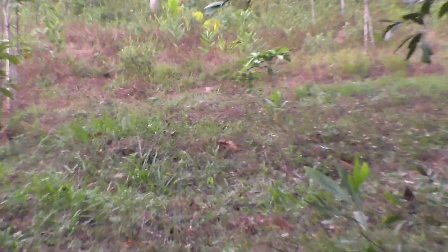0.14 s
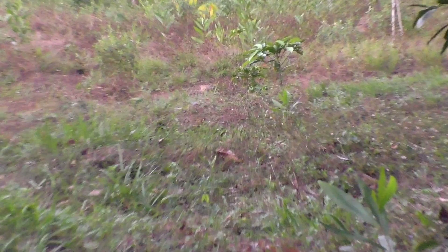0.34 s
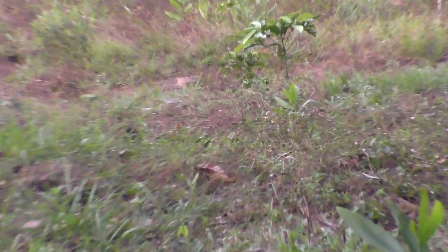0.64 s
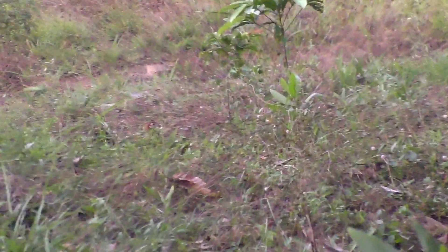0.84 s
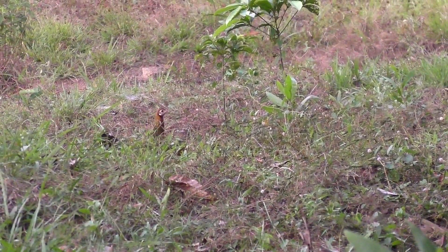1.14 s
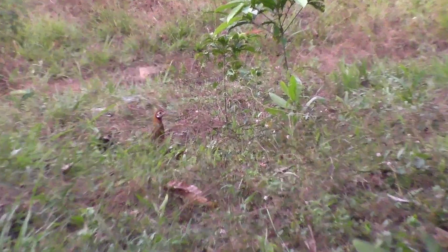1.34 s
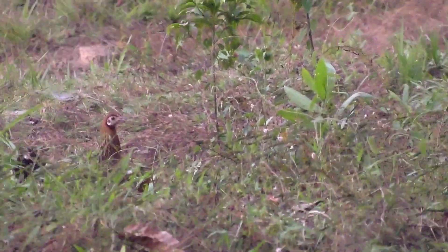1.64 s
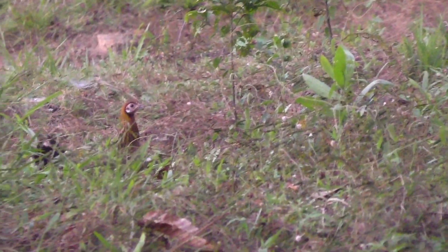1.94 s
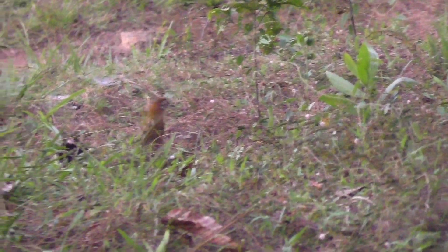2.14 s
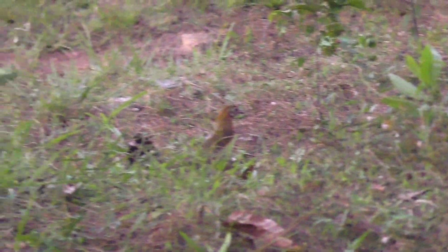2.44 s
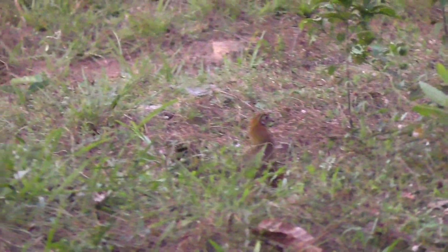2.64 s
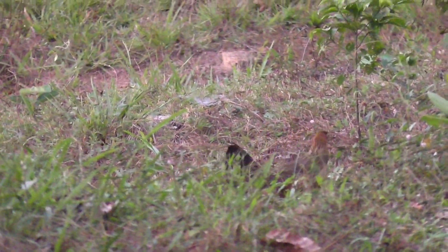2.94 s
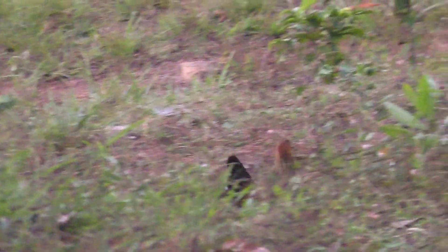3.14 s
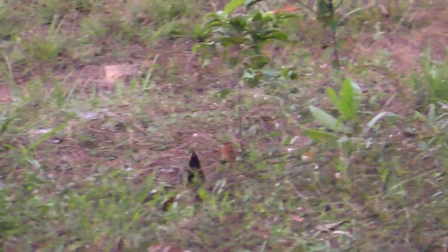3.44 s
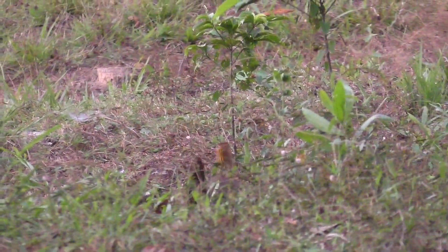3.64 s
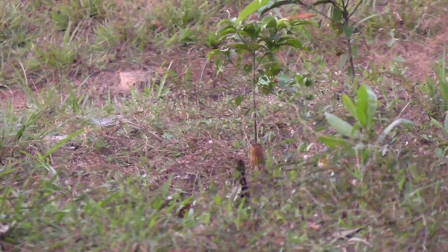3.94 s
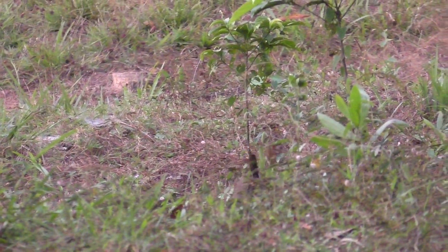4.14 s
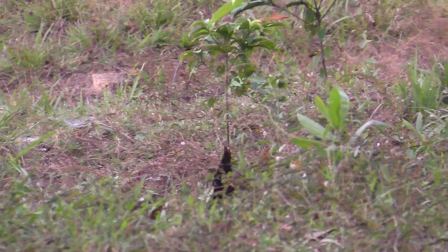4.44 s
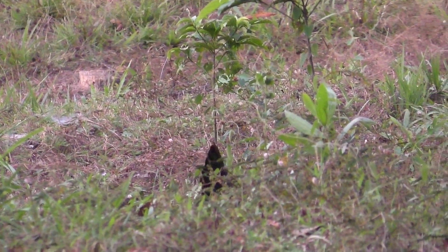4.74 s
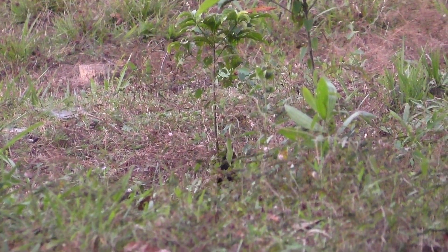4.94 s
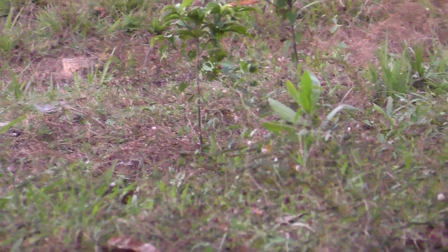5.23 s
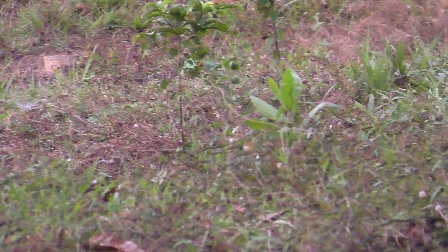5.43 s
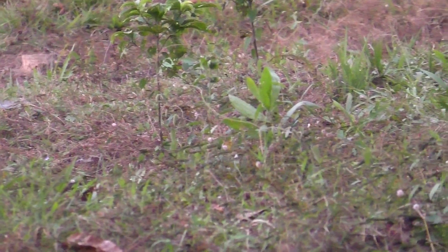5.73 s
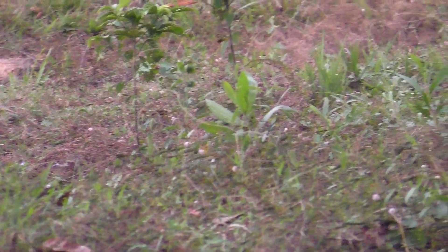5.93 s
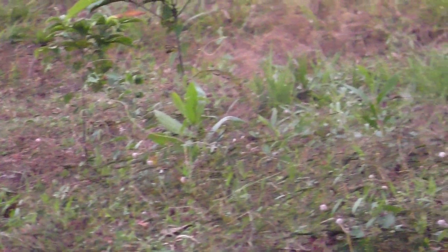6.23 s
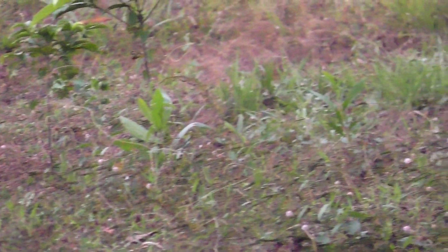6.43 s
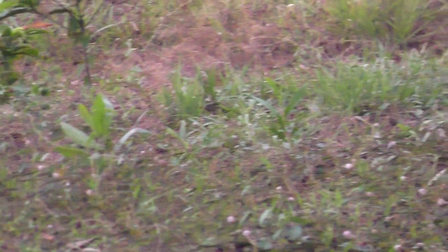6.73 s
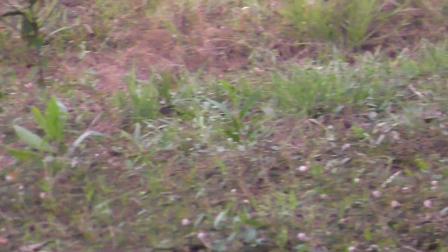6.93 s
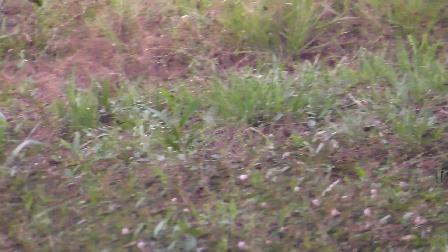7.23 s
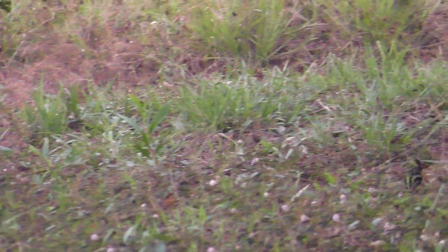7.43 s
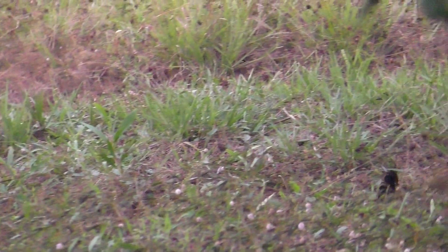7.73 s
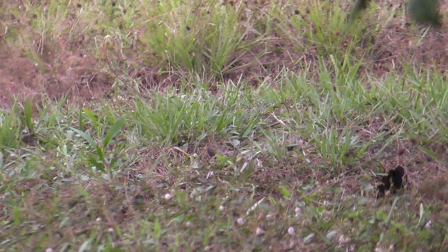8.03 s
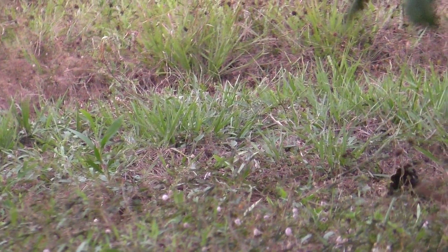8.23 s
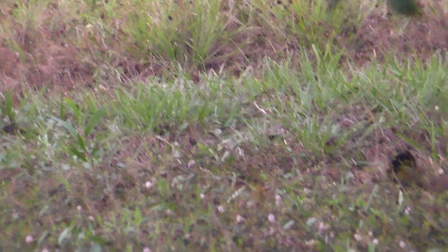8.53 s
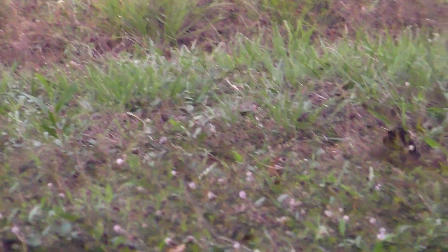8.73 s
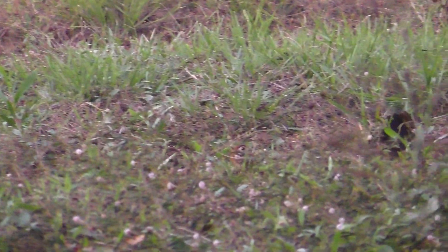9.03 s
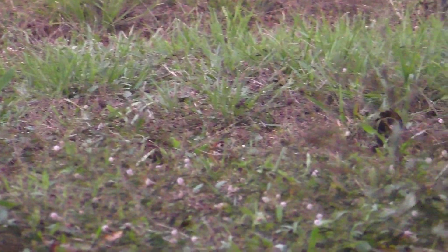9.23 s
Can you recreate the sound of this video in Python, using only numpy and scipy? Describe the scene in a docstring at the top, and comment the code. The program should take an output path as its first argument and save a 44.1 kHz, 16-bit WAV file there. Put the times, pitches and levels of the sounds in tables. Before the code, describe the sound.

A daytime grassy woodland hums with insects throughout, picked up by a hand-held camera's stereo microphones. A near cricket chirps at about 7 kHz, mostly in pairs, slightly right; a rapid pulsing cricket sits left, broken by brief gaps near 8.6 and 9.1 s. Others peep in falling tones, and trills switch on about every 1.4 s. Behind them a far whine throbs five or six times a second under a high sizzle. From 0 to 3 s hens cluck faintly and hoarsely and a dove coos low. Hard housing clicks strike at 0.9 and 1.7 s, the latter with lens motor hum; a weaker one comes at 3.1 s. Raspy downward insect strokes recur, swelling around 7 s. From 3.6 to 6.7 s a distant bird cackles about four times a second, far right; the dove returns around 5.5-6.2 s. Faint engine drone, low rumble and steady hiss remain to the end.

```python
"""Grassy woodland by day, heard through a hand-held camera with two microphones.
All along, a near cricket chirps, mostly in pairs, others peep, pulse and trill (gated sines), a far chorus whines
and sizzles (narrow noise bands) and an engine drones (sine orders) over rumble, hiss and camera hum (shaped noise).
At first hens cluck, a dove coos and the housing clicks (ringing modes); insects rasp in bursts (sliding strokes).
From 3.6 to 6.7 s a bird cackles far to the right (overtones through a throat); near 5.5 s the dove coos again."""
import sys
import numpy as np
from scipy import signal
from scipy.fft import rfft, irfft, next_fast_len
from scipy.io import wavfile

SR = 44100
rng = np.random.default_rng(int(sys.argv[2]) if len(sys.argv) > 2 else 0)


def elevation(decibels):
    """Turn decibel levels (scalar or array-like) into linear amplitude ratios."""
    levels = np.asarray(decibels, float)
    return 10 ** (levels / 20)


def unload_wav(signal):
    """Save mono or channel-first audio to the path in sys.argv[1] as 16-bit WAV at rate SR, clipped to [-1, 1]."""
    wavfile.write(
        sys.argv[1],
        SR,
        np.round(np.clip(np.atleast_2d(signal).T, -1, 1) * 32767).astype(np.int16),
    )


N = 413196


def near_cricket():
    """The wings ring as a near sine; each chirp swells, breaks and sinks in pitch."""
    # chirps, mostly in pairs: start_s, level_db (added to the shape)
    chirps = [(.055, -39.5), (.2884, -40.5), (.4954, -44), (.785, -41), (1.0246, -42.5), (1.294, -42),
              (1.5297, -41), (1.957, -42), (2.1834, -40), (2.7474, -40.5), (2.9637, -41), (3.492, -40),
              (3.709, -41), (4.264, -39.5), (4.478, -40.5), (5.015, -39.5), (5.2315, -40), (5.781, -39.5),
              (5.9938, -40), (6.532, -39.5), (6.7491, -41), (7.2983, -40.5), (7.517, -40.5), (8.023, -40.5),
              (8.24, -42), (8.776, -41.5), (8.9964, -40)]
    # one chirp: after_start_s, pitch_hz, level_db
    chirp_shape = [(-.006, 6955, -22), (.002, 6955, -3), (.025, 6952, -1), (.04, 6950, 1), (.05, 6948, 4),
                   (.055, 6930, -4), (.064, 6880, -5), (.07, 6800, -10), (.078, 6720, -26)]
    song = sing(chirps, chirp_shape, np.sin, spread=0.0018, lr_db=-4)
    return song * elevation(2.0 * drift(99))


def pulsing_cricket():
    """Each wing stroke sweeps upward in pitch and carries a faint octave; strokes come in even runs."""
    # runs of strokes: first_s, end_s, rate_hz
    pulse_runs = [(.0097, 3.86, 35.62), (3.9245, 8.57, 35.55), (8.8988, 9.02, 35.0), (9.2333, 9.36, 35.0)]
    # one stroke: from_centre_s, pitch_hz, level_db
    stroke_shape = [(-.0075, 5560, -20), (-.0058, 5650, 0), (-.004, 5800, 4), (-.002, 5880, 7),
                    (.002, 5905, 7), (.005, 5910, -1), (.009, 5910, -18)]
    stroke_db = -58.5   # added to the shape
    strokes = []
    for first, end, rate_hz in pulse_runs:
        strokes += [(s, stroke_db) for s in np.arange(first, end, 1 / rate_hz)]

    def wing(phase):
        return np.sin(phase) + 0.19 * np.sin(2 * phase)

    return sing(strokes, stroke_shape, wing, spread=0.0015, lr_db=5.5) * elevation(1.0 * drift(18))


def peeping_cricket():
    """Near-sine peeps that fall in pitch."""
    # peeps: start_s, level_db (added to the shape)
    peeps = [(.3172, -44), (.599, -40), (.7856, -42), (.9682, -41), (1.1333, -40), (1.725, -41),
             (1.8907, -40), (2.439, -40), (2.6374, -39), (3.2914, -40), (3.4745, -42), (4.091, -38),
             (4.2901, -41), (4.9, -40), (5.0894, -38), (5.693, -40), (5.905, -40), (6.5306, -41),
             (6.6894, -38), (7.2684, -45), (8.3404, -42), (8.5934, -43)]
    # one peep: after_start_s, pitch_hz, level_db
    peep_shape = [(-.012, 6300, -17), (0, 6130, -12), (0.014, 6050, -10), (.03, 6040, -12),
                  (.042, 6050, -20)]
    return sing(peeps, peep_shape, np.sin, spread=0.0018, lr_db=-.6)


def trills():
    """Two close wing tones, wavering and throbbing strong-weak, switched on in evenly spaced bouts."""
    # wing tones: pitch_hz, relative_level_db
    tones = [(6328, 0), (6268, -3)]
    first_s, every_s, length_s = -.67, 1.382, .76
    beat_hz, level_db = 37.7, -57.5
    t = np.arange(N) / SR
    since = (t - first_s) % every_s
    gate = elevation(level_db) * np.clip(np.minimum(since, length_s - since) / 0.021, 0, 1)
    # the faster part at twice the beat is the stronger one
    throb = 1 + 0.08 * np.cos(2 * np.pi * beat_hz * t - 1.4) + 0.28 * np.cos(4 * np.pi * beat_hz * t)
    wings = 0
    for hz, tone_db in tones:
        phase = 2 * np.pi * np.cumsum(hz + 9 * drift(13.7)) / SR
        wings = wings + elevation(tone_db + 2.6 * drift(26)) * np.sin(phase)
    return pan(wings * throb * gate, .4)


def cackle():
    """Far bird: overtones of a falling voice, roughened by breath and passed through the throat."""
    # notes: start_s, level_db (added to the shape, before the throat)
    notes = [(3.5582, -52), (3.7684, -52), (4.012, -48.5), (4.2542, -48.5), (4.5026, -47), (4.7504, -46.5),
             (4.9924, -48), (5.246, -47), (5.4975, -45), (5.7464, -48), (5.9924, -49), (6.2057, -48.5),
             (6.4334, -50.5), (6.664, -51.5)]
    # one note: after_start_s, voice_hz, level_db
    note_shape = [(-.008, 224.8, -16.5), (0, 234.2, -11.5), (.04, 216.3, -12), (.09, 195, -19.5),
                  (.13, 178, -22), (0.161, 167, -24)]
    # overtones: multiple_of_voice, relative_level_db
    overtones = [(6, -7), (7, -1.5), (8, 2.5), (9, -3), (10, -11)]

    def voice(phase):
        return sum(elevation(db) * np.sin(round(k) * phase + k * k) for k, db in overtones)

    throat = signal.butter(3, [1330, 1950], "band", fs=SR, output="sos")
    calls = sing(notes, note_shape, voice, spread=.02, lr_db=-11.5)
    return signal.sosfilt(throat, calls * (1 + 0.6 * drift(110)))


def clucks():
    """Hens: short gliding tones, made hoarse by breath."""
    # clucks: start_s, length_s, start_hz, end_hz, level_db
    notes = [(.045, 0.049, 985, 917, -55), (.17, 0.1, 1340, 1264, -61.5), (.27, 0.042, 1040, 1040, -57.5),
             (.44, 0.087, 889, 920, -58), (1.19, 0.13, 1240, 1113, -66), (1.37, 0.041, 1237, 1200, -58),
             (1.45, 0.12, 1210, 1175, -64.5), (1.62, .056, 917, 1010, -59), (1.64, 0.078, 795, 800, -53.5),
             (1.99, 0.31, 1730, 1760, -66), (2.05, 0.1, 1280, 1480, -64), (2.33, 0.038, 2280, 1870, -61),
             (2.6, 0.06, 1074, 1270, -63), (2.655, .03, 1730, 1940, -59), (2.68, 0.071, 1290, 1360, -62),
             (2.8, .053, 1010, 1360, -62), (2.85, .054, 1640, 1920, -59), (2.89, .078, 1575, 1500, -64.5)]
    bend, rough = 1.8, .42   # a bend above 1 brings the glide late in the note
    out = np.zeros((2, N))
    for s, length_s, start_hz, end_hz, level_db in notes:
        u = np.linspace(0, 1, int(length_s * SR))
        phase = 2 * np.pi * np.cumsum(start_hz + (end_hz - start_hz) * u ** bend) / SR
        swell = np.sqrt(2 * np.sin(np.pi * u))
        add(out, pan(np.sin(phase) * swell * elevation(level_db), -1.3), s)
    return out * (1 + rough * drift(100))


def chatter():
    """Husky chatter of far birds: a noise band of flickering level."""
    # spells: start_s, end_s, start_level_db, end_level_db
    spells = [(1.9, 3.7, -60.5, -62), (3.6, 6.9, -65, -66)]
    return band(pair(0.43), 1006, 1980) * runs(spells, ramp_s=0.089) * elevation(2.3 * drift(12))


def dove():
    """Far coos: near sines that rise slightly in pitch."""
    # coos: start_s, level_db (added to the shape)
    coos = [(0.149, -60), (0.449, -60), (0.759, -63), (1.039, -58), (1.329, -57), (1.639, -64),
            (1.949, -56), (2.25, -62), (2.563, -58), (2.894, -58.5), (5.469, -60), (5.787, -56),
            (6.168, -58.5)]
    # one coo: after_start_s, pitch_hz, level_db
    coo_shape = [(-.02, 362, -12), (.01, 366, -1), (.06, 369, -1), (.1, 372, -13)]
    return sing(coos, coo_shape, np.sin, spread=0.019, lr_db=.3)


def woodland(x):
    """Eight scattered echoes off trunks and ground, on alternate sides, weaker the later they come."""
    out = np.zeros((2, N))
    for k, lag_s in enumerate(rng.uniform(0.0035, 0.18, 8)):
        one_side = [[k % 2], [1 - k % 2]]
        add(out, x[::-1] * elevation(-250 * lag_s) * one_side, lag_s)
    return out


def rasping():
    """Each stroke slides down in pitch; a lead singer and a few clear strokes stand out of the blurred crowd."""
    # bursts: centre_s, peak_db (added to the steady crowd)
    bursts = [(.1, -53.5), (.34, -57.5), (1.3, -73), (2.68, -67), (3.04, -58), (6.55, -71), (6.9, -55.5),
              (7.16, -55.5), (7.39, -53), (7.7, -66)]
    # a nearer one, three clear strokes at a time: first_stroke_s, level_db (of the middle stroke, plus shape)
    triples = [(1.546, -52), (1.846, -51), (2.064, -53), (2.282, -57), (2.499, -54), (2.716, -56),
               (2.978, -66), (3.238, -53), (3.501, -56), (3.765, -55), (4.028, -57), (4.282, -58),
               (7.554, -54), (7.816, -55), (8.079, -54), (8.342, -57), (8.605, -54)]
    # one clear stroke: after_start_s, pitch_hz, level_db
    slide_shape = [(-.008, 4860, -18), (-.003, 4780, -5), (.008, 4520, -4), (.02, 4230, -8),
                   (.024, 4150, -20)]
    high_hz, low_hz, lead_share = 4850, 4200, .2
    burst_s, crowd_db = .22, -66
    stroke_every_s, stroke_grows_db = .0397, 2

    cycle = np.cumsum(25 + 1.5 * drift(1.5)) / SR % 1
    stroke = np.minimum(cycle / .45, 1)   # the rest of each cycle is silent
    phase = 2 * np.pi * np.cumsum(high_hz + (low_hz - high_hz) * stroke) / SR
    slide = np.sin(phase) * np.sqrt(np.sin(np.pi * stroke) + 1e-9)
    lead = rms_one(slide * (stroke < 1))
    crowd = band(pair(.45), 4250, 4800)
    blend = lead * np.sqrt(lead_share) + crowd * np.sqrt(1 - lead_share)

    t = np.arange(N) / SR
    swell = sum(elevation(db) * np.cos(np.pi * np.clip((t - s) / burst_s, -.5, .5)) for s, db in bursts)
    strokes = [(s + k * stroke_every_s, db + (k - 1) * stroke_grows_db) for s, db in triples for k in range(3)]
    clear = sing(strokes, slide_shape, np.sin, spread=0.0084, lr_db=1.2) * elevation(1.9 * drift(70))
    return blend * (elevation(crowd_db + 2.2 * drift(6.8)) + swell) + clear


def far_throb():
    """Level in dB of the throb shared by the whine and its octave: it breaks off, then swells again."""
    # the throb runs early or late: time_s, lead_beats
    throb_lead = [(.25, 0.2), (1.25, 0.2), (2.25, -0.023), (2.75, 0.09), (3.25, 0.21), (4.25, 0.49),
                  (5.75, 0.28), (6.25, 0.52), (7.25, 0.15), (8.75, 0.31)]
    beats = 5.6 * np.arange(N) / SR + in_time(throb_lead)[0]
    return 5.5 * (np.interp(beats % 1, [0, .2, .3, .5, 1], [1, 1, 1, 0.24, 1]) - .7)


def whine(throb_db):
    """Too many far singers to part: resonant noise with one wavering singer standing out."""
    # resonances: centre_hz, width_hz, relative_level_db
    modes = [(2705, 85, 0), (2535, 80, -12), (2830, 260, -10)]
    level_db, fade_db_per_s = -53.5, 0.18
    lead = np.sin(2 * np.pi * np.cumsum(2708 + 30 * drift(12)) / SR) * elevation(2 * drift(45))
    singers = rms_one(rms_one(resonate(pair(.7), modes)) + .6 * lead)
    return singers * elevation(level_db - fade_db_per_s * np.arange(N) / SR + throb_db + 0.39 * drift(1.3))


def chorus(throb_db):
    """Far crickets blurred into narrow noise bands that flicker slightly."""
    # bands: low_hz, high_hz, level_db, flicker_db
    bands = [(5230, 5560, -61, .9), (5600, 6000, -65, .7), (6000, 6300, -65, 1.3), (6450, 6780, -61.5, .9),
             (6780, 7080, -65, 1.1)]
    voices = []
    for low_hz, high_hz, level_db, flicker_db in bands:
        voices.append(band(pair(0.99), low_hz, high_hz) * elevation(level_db + flicker_db * drift(4.3)))
    voices[0] *= elevation(1.27 * throb_db)   # the octave of the whine throbs along
    return sum(voices)


def sizzle():
    """Cicadas: two overlapping noise bands, the swarm leaning to its higher or lower voices."""
    # lean of the swarm: time_s, centre_hz
    centre = [(0, 9440), (1.3, 9350), (4.31, 9200), (4.7, 9700), (5.11, 8980), (5.58, 9600), (5.87, 9400),
              (9.37, 9320)]
    centre_hz, = in_time(centre)
    high = np.clip((centre_hz - 8800) / 1200, 0, 1)
    low_voices = band(pair(1.0), 8380, 9910) * np.sqrt(1 - high)
    high_voices = band(pair(0.72), 8700, 10360) * np.sqrt(high)
    return (low_voices + high_voices) * elevation(-57 + 0.66 * drift(3.1))


def motor():
    """The lens motor's hum shakes the two microphones in opposite sense; a thin tone rings with it."""
    # hum while the motor works, added to the idle hum: start_s, end_s, start_level_db, end_level_db
    hum_runs = [(-.1, .9, -64.5, -68), (1.35, 1.71, -70, -48), (3.1, 3.52, -66, -63)]
    # spells when the thin tone stands out, added to its idle: start_s, end_s, start_level_db, end_level_db
    tone_runs = [(-.1, .9, -83, -81), (2.2, 3.1, -71, -77), (6.1, 7.35, -69, -74)]
    hum_idle_db, tone_idle_db, ramp_s = -70.5, -73, 0.021
    hum = pan(resonate(pair(-0.95), [(737.7, 67, 2.0), (800, 146, -2)]), -6.0)
    tone = resonate(pair(0.56), [(1944, 9.8, 0)])
    return hum * (elevation(hum_idle_db) + runs(hum_runs, ramp_s)) + tone * (elevation(tone_idle_db) + runs(tone_runs, ramp_s))


def housing_clicks():
    """Each click rings the plastic housing's modes twice, with a crackle of a few milliseconds."""
    # clicks: start_s, level_db (rms of about the first 5 ms), low_cut_hz, left_minus_right_db
    clicks = [(0.905, -28.5, 640, 1.5), (1.6996, -26, 684, 2.5), (3.116, -47, 3940, -4),
              (3.729, -55.5, 500, -6.0), (8.123, -47.5, 3500, 1)]
    # housing modes: pitch_hz, relative_level_db, t60_s
    modes = [(378, -1, 0.057), (1110, -5.5, 0.05), (1450, 3.5, 0.018), (1870, 5.5, 0.056), (2350, 7, 0.019),
             (3500, -40, 0.036)]
    out, t = np.zeros((2, N)), np.arange(int(0.037 * SR)) / SR
    for s, level_db, cut_hz, lr_db in clicks:
        turns = rng.uniform(-0.58, 0.66, (len(modes), 2, 1))   # modes reach the microphones differently
        ring = 0
        for (hz, db, t60_s), turn in zip(modes, turns):
            ring = ring + elevation(db - 60 * t / t60_s) * np.sin(2 * np.pi * hz * t + turn)
        ring = ring + .8 * np.pad(ring, ((0, 0), (82, 0)))[:, :len(t)]   # the bounce, 82 samples later
        mid, side = rng.standard_normal((2, len(t))) * t ** 1.5 * np.exp(-t / .0009)
        crackle = signal.lfilter([1], [1, -.45], mid + 0.7 * side * [[1], [-1]])
        click = rms_one(ring) + elevation(0.5) * rms_one(crackle)
        click = signal.sosfilt(signal.butter(2, cut_hz, "high", fs=SR, output="sos"), click)
        click = click / np.sqrt(np.mean(click[:, :200] ** 2))
        add(out, pan(click * elevation(level_db), lr_db), s)
    return out


def engine():
    """Far engine: low orders of the firing rate, each wavering in level on its way over the fields."""
    # speed: time_s, firing_rate_hz
    speed = [(0.0, 29.67), (1.12, 30.7), (2.97, 30.51), (4.15, 29.47), (6.65, 31.63), (9.26, 33.33),
             (9.37, 32.6)]
    # orders: multiple_of_rate, level_db
    orders = [(4, -77), (5, -65.5), (6, -65), (7, -75), (8, -74), (9, -72), (10, -76), (11, -72), (12, -75)]
    phase = 2 * np.pi * np.cumsum(in_time(speed)[0] * (1 + 0.0044 * drift(3.16))) / SR
    drone = sum(elevation(db + 1.9 * drift(2.1)) * np.sin(round(k) * phase + k * k) for k, db in orders)
    return pan(drone, -.6)


def air():
    """Low rumble of the air, little alike in the two channels."""
    # spectrum: frequency_hz, relative_level_db (per Hz)
    spectrum = [(15, -46), (25, -17.5), (54, -9.5), (101, -8.5), (134, -5.5), (151, -4.5), (197, -4.5),
                (225, -5), (349, -3.5), (562, -15), (1040, -13), (1580, -14.5), (1950, -15.5), (2400, -31),
                (3120, -35), (5280, -120)]
    # tilt of the side spectrum, shape only: frequency_hz, side_minus_mid_db
    side_tilt = [(60, -1.5), (150, -2.5), (400, -4), (1000, -1), (2200, -6.5)]
    # loudness of the mid: time_s, level_db
    loudness = [(0, -57), (4.1, -60), (6, -58.5), (9.37, -58)]
    hz, level_db = np.transpose(spectrum)
    side_db = np.interp(hz, *np.transpose(side_tilt))
    mid, side = rng.standard_normal((2, N))
    side = coloured(side, np.transpose([hz, level_db + side_db]))
    rumble = coloured(mid, spectrum) + 0.87 * side * [[1], [-1]]
    return rumble * elevation(in_time(loudness)[0])


def hiss():
    """Steady shaped noise, partly alike in the two channels."""
    # spectrum: frequency_hz, relative_level_db (per Hz)
    spectrum = [(1500, -14.5), (2300, -1), (3100, 0), (3500, -8.5), (3950, -7.5), (5000, -6.5), (7400, -3),
                (8000, -5.5), (11000, -7), (13000, -11), (15500, 0)]
    return coloured(pair(0.42), spectrum) * elevation(-54)


def sing(events, shape, voice, spread, lr_db):
    """Play one (time, pitch, level) template at every (time, level) event, slightly detuned each time."""
    s, hz, level_db = np.transpose(shape)
    t, out = np.arange(s[0], s[-1], 1 / SR), np.zeros((2, N))
    pitch_hz, shape_db = np.interp(t, s, hz), np.interp(t, s, level_db)
    for (start, event_db), (tune, turn) in zip(events, rng.standard_normal((len(events), 2))):
        phase = 2 * np.pi * np.cumsum(pitch_hz) * (1 + spread * tune) / SR + 9 * turn
        add(out, pan(voice(phase) * elevation(shape_db + event_db), lr_db), start + s[0])
    return out


def runs(rows, ramp_s):
    """Gain of a source that sounds in spells (start, end, dB, dB), faded in and out."""
    t = np.arange(N) / SR
    gain = 0
    for start, end, start_db, end_db in rows:
        fade = np.clip(np.minimum(t - start, end - t) / ramp_s, 0, 1)
        gain = gain + elevation(np.interp(t, [start, end], [start_db, end_db])) * fade
    return gain


def rms_one(x):
    """Scale to rms 1."""
    return x / np.sqrt(np.mean(x ** 2) + 1e-20)


def in_time(rows):
    """Columns of a curve after its time column, one value a sample."""
    s, *columns = np.transpose(rows)
    return [np.interp(np.arange(N) / SR, s, c) for c in columns]


def drift(rate_hz):
    """Slow random curve of mean 0 and spread 1: twice low-passed noise, drawn every 40 samples."""
    r = np.exp(-80 * np.pi * rate_hz / SR)
    noise = rng.standard_normal(N // 40 + 2002)
    slow = signal.lfilter([1], [1, -2 * r, r * r], noise)[2000:]   # skip the filter's start
    return np.interp(np.arange(N) / 40, np.arange(len(slow)), rms_one(slow - slow.mean()))


def pair(alike):
    """Two white noises whose correlation is alike (-1 to 1)."""
    mid, side = rng.standard_normal((2, N))
    alike = np.clip(alike, -1, 1)
    return np.sqrt(1 + alike) * mid + np.sqrt(1 - alike) * side * [[1], [-1]]


def pan(x, lr_db):
    """Place a sound between the channels; positive is left."""
    return x * elevation(np.array([[lr_db / 2], [-lr_db / 2]]))


def resonate(x, modes):
    """Parallel resonances (Hz, width Hz, dB), each applied twice for dark valleys."""
    out = 0
    for hz, width_hz, level_db in modes:
        r = np.exp(-np.pi * width_hz / SR)
        section = [(1 - r * r) / 2, 0, (r * r - 1) / 2, 1, -2 * r * np.cos(2 * np.pi * hz / SR), r * r]
        out = out + elevation(level_db) * rms_one(signal.sosfilt([section, section], x))
    return out


def band(x, low_hz, high_hz):
    """Steep band-pass, rms 1."""
    return rms_one(signal.sosfilt(signal.butter(3, [low_hz, high_hz], "band", fs=SR, output="sos"), x))


def coloured(x, spectrum):
    """Noise given a spectrum, rms 1."""
    size = next_fast_len(N)
    hz, level_db = np.transpose(spectrum)
    bin_hz = np.arange(size // 2 + 1) * SR / size
    gain = elevation(np.interp(np.log(bin_hz + 1), np.log(hz), level_db))
    return rms_one(irfft(rfft(x, size) * gain, size)[..., :N])


def add(out, sound, s):
    """Mix a short stereo sound in at time s."""
    i = max(round(s * SR), 0)
    out[:, i:i + sound.shape[1]] += sound[:, :N - i]


def scene():
    """Singers and birds with their echoes, far insects and engine, camera noises, air rumble and hiss."""
    near = near_cricket() + pulsing_cricket() + peeping_cricket()
    near = near + cackle() + clucks() + chatter() + dove()
    throb_db = far_throb()
    far_insects = rasping() + whine(throb_db) + chorus(throb_db) + sizzle()
    camera = motor() + housing_clicks()
    return near + elevation(-18.0) * woodland(near) + trills() + far_insects + camera + air() + engine() + hiss()


def top_cut(x):
    """Nothing passes above the cut-off."""
    return signal.sosfilt(signal.butter(12, 16460, fs=SR, output="sos"), x)


def record(dry):
    """A steep low-pass takes off the top, 60 dB down from 15.75 kHz."""
    cut = signal.sosfilt(signal.cheby2(12, 60, 15750, fs=SR, output="sos"), dry)
    return top_cut(cut)


dry = scene()
out = record(dry)
unload_wav(out)
```